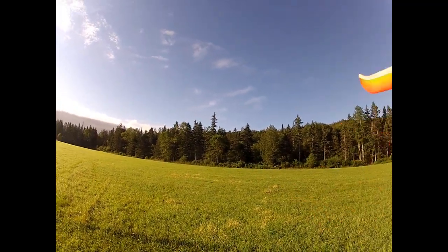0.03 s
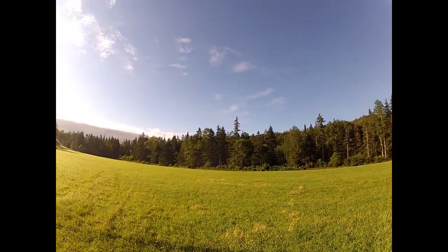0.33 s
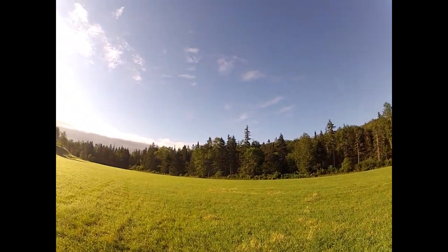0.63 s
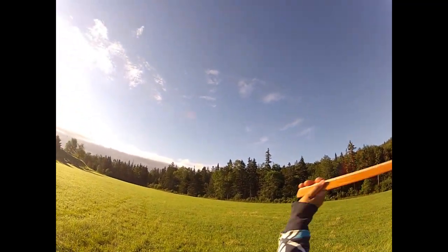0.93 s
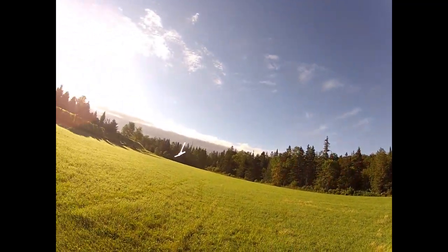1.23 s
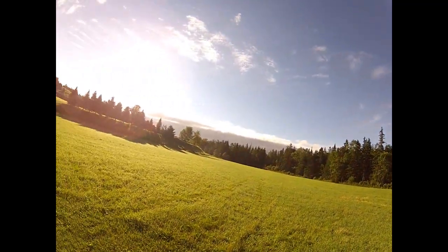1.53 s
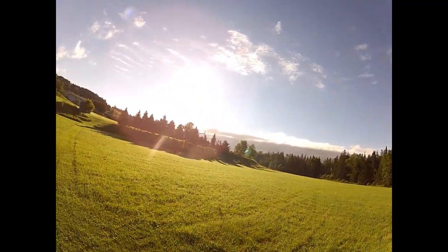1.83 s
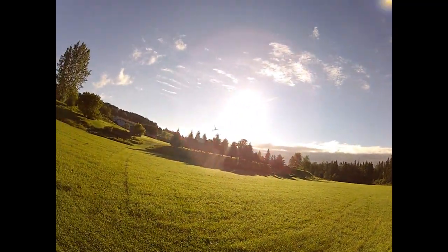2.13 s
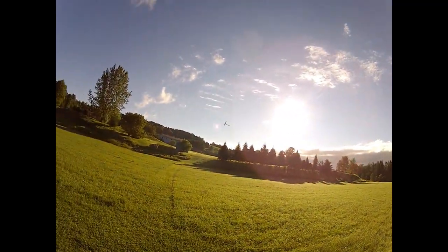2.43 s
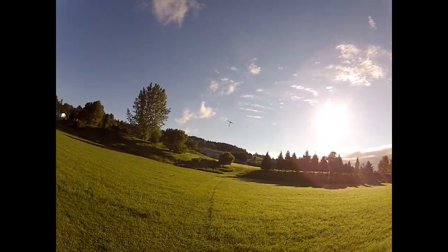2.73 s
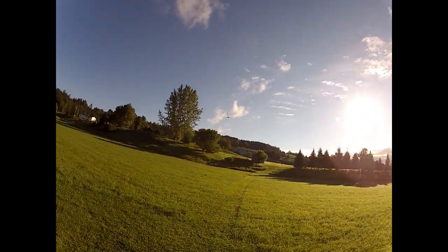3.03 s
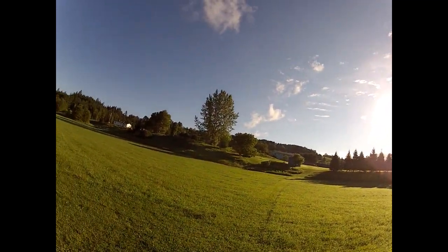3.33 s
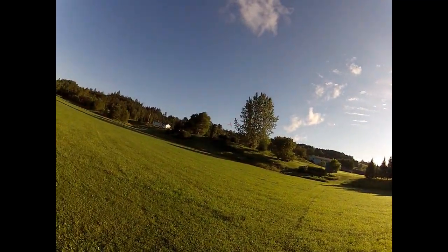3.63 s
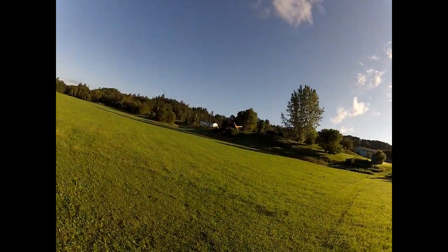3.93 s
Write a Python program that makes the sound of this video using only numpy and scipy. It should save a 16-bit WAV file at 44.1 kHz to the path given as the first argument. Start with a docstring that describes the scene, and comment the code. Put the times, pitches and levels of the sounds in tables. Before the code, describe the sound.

One short whoosh of a boomerang throw amid light clicks, soft wind and distant birdsong.

```python
"""A boomerang is thrown across an open meadow, heard from a small camera worn by the thrower.
From the start low wind rumbles, a faint hum throbs and a songbird sings at the forest edge.
A second in, the plastic mount clicks, arm and blades whoosh past the microphone and a small metal
part, perhaps a zip pull, jingles. Air and clothing rustle as the thrower turns to follow the flight.
A few more clicks and bird notes follow, then rustle and hum sink back into the wind."""
import sys
import numpy as np
from scipy import signal
from scipy.fft import rfft, irfft
from scipy.io import wavfile
from scipy.ndimage import uniform_filter1d

SR = 44100
rng = np.random.default_rng(int(sys.argv[2]) if len(sys.argv) > 2 else 0)


def put_to_file(sound):
    """Save the sound as 16-bit audio at rate SR, in the file named by the first command-line argument."""
    columns = np.atleast_2d(sound).T  # one column per channel
    safe = np.clip(columns, -1, 1)
    whole_steps = np.round(safe * 32767)
    wavfile.write(sys.argv[1], SR, whole_steps.astype(np.int16))


N = 176400
T = np.arange(N) / SR
HZ = np.fft.rfftfreq(N, 1 / SR)


def amp(db):
    """Decibels to gain."""
    return 10 ** (np.asarray(db) / 20)


def unit(x):
    """Scales to rms 1."""
    return x / np.sqrt(np.mean(x ** 2) + 1e-20)


def colour(points):
    """EQ curve through (Hz, dB) points on a log-frequency axis."""
    hz, db = np.transpose(points)
    return amp(np.interp(np.log(HZ + 1), np.log(hz + 1), db))


def level(points):
    """Fader curve through (seconds, dB) points."""
    return amp(np.interp(T, *np.transpose(points)))


def bell(peak_s, width_s):
    """Gaussian swell that peaks at 1."""
    return np.exp(-.5 * ((T - peak_s) / width_s) ** 2)


def hump(hz, width):
    """Gain of a steep-sided resonance."""
    return 1 / (1 + ((HZ - hz) / (.5 * width)) ** 4) ** .5


def band_power(bands):
    """Summed power spectrum of several resonances."""
    return sum((amp(db) * hump(hz, width)) ** 2 for hz, width, db in bands)


def noise(gain):
    """Noise of rms 1 with the given spectrum."""
    return unit(irfft(rfft(rng.standard_normal(N)) * gain, N))


def wander(hz):
    """Random drift of rms 1, up to about the given rate."""
    return noise(1 / (1 + (HZ / hz) ** 4))


def tone(hz):
    """Sine that follows a pitch curve."""
    return np.sin(2 * np.pi * np.cumsum(hz) / SR)


def patchy(points, patch_db):
    """Coloured noise of rms 1 whose spectrum drifts in small patches of time and frequency."""
    spectra = signal.stft(rng.standard_normal(N), SR, nperseg=1024, noverlap=768)[2]
    patches = uniform_filter1d(rng.standard_normal(spectra.shape), size=10, axis=0)
    patches = unit(uniform_filter1d(patches, size=14, axis=1))
    mottled = signal.istft(spectra * amp(patch_db * patches), nperseg=1024, noverlap=768)[1][:N]
    return unit(irfft(rfft(mottled) * colour(points), N))


def add(mix, start_s, sound):
    """Mixes a sound in at a time."""
    part = mix[max(round(start_s * SR), 0):][:len(sound)]
    part += sound[:len(part)]


def whoosh(peak_s=1.084, hold_s=.029, rise_db_per_s=511, fall_db_per_s=696):
    """Eddies shed by arm and blades swell, pass the microphone and leave a soft wake."""
    # Body of the whoosh. Each row: centre in Hz, width in Hz, relative level in dB.
    resonances = [(107, 75, -4), (251, 83, 4.5), (359, 104, 3.5), (680, 306, -4), (1310, 540, -26),
                  (1960, 310, -20)]
    # Hiss beneath the body. Each row: frequency in Hz, relative level in dB.
    hiss_eq = [(40, -8.5), (500, -33), (1100, -16.5), (2400, -29), (2900, -26), (3700, -29.5),
               (4800, -29.5), (5400, -38), (5900, -51)]
    spectrum = np.sqrt(colour(hiss_eq) ** 2 + band_power(resonances))
    swell = amp(-rise_db_per_s * np.maximum(peak_s - T, 0))
    swell *= amp(-fall_db_per_s * np.maximum(T - peak_s - hold_s, 0))
    rush = swell * noise(spectrum) * amp(2 * wander(hz=119))  # eddies roughen the level
    rush *= np.linalg.norm(swell) / np.linalg.norm(rush)
    wake = bell(peak_s + hold_s, width_s=.04) * noise(spectrum)
    wake *= np.maximum(swell, T > peak_s) ** .5  # fades in with the rush
    return amp(-30) * rush + amp(-42.5) * wake


def blade_swish():
    """The blades cut the air brightly at the fastest moment of the throw."""
    # Bright edge of the blades. Each row: centre in Hz, width in Hz, relative level in dB.
    resonances = [(1283, 320, 3.5), (1570, 190, -11), (1920, 270, -11.5)]
    swell = bell(peak_s=1.103, width_s=.015)
    rush = swell * noise(np.sqrt(band_power(resonances)))
    return amp(-36.5) * rush * np.linalg.norm(swell) / np.linalg.norm(rush)


def taps(hits, modes, crack_db, attack_s=.00038, crack_decay_s=.001):
    """Each contact gives a brief crack and rings the modes of a small part."""
    out, t = np.zeros(N), np.arange(2048) / SR
    crack = noise(hump(hz=2400, width=2400))
    for start_s, db in hits:
        ring = sum(amp(mode_db - 60 * t / t60) * np.sin(2 * np.pi * (hz * t + rng.random()))
                   for hz, mode_db, t60 in modes)
        snap = amp(crack_db) * np.exp(-t / crack_decay_s) * crack[round(start_s * SR):][:len(t)]
        add(out, start_s, amp(db) * np.minimum(t / attack_s, 1) * (ring + snap))
    return out


def mount_clicks():
    """The plastic camera mount clicks with a hard snap and a short ring."""
    # Clicks of the mount. Each row: start in seconds, gain in dB.
    hits = [(.9870, -33), (1.1500, -40.5), (1.8122, -38.5), (1.9175, -42.5), (2.894, -53)]
    # Ring of the plastic. Each row: pitch in Hz, relative level in dB, seconds to fall 60 dB.
    modes = [(900, -9.5, 0.028), (2220, -15, 0.013), (2600, -17, .02), (2880, -9.5, 0.015),
             (3880, -17.5, 0.016), (4660, -7.5, .015), (4780, -14, .01)]
    return taps(hits, modes, crack_db=-8)


def zip_pull():
    """A small metal tab jingles in thin, high ticks around the throw."""
    # Ticks of the tab. Each row: start in seconds, gain in dB.
    hits = [(.9842, -59), (1.0127, -49), (1.0560, -42), (1.1732, -44.5), (1.1772, -41), (1.1970, -50),
            (1.2110, -47), (1.2210, -47)]
    # Ring of the metal. Each row: pitch in Hz, relative level in dB, seconds to fall 60 dB.
    modes = [(3080, -2.5, 0.011), (4140, -7, 0.011), (5050, -7, 0.018), (5220, -9, 0.019),
             (5570, -27.5, 0.0098)]
    return taps(hits, modes, crack_db=-17)


def rustle():
    """Air and clothing rub as the thrower turns, with a few short brushes of cloth."""
    # Swell of the turn. Each row: time in seconds, level in dB.
    turn_fader = [(0, -56), (.8, -55.5), (1.2, -50), (1.55, -50), (1.85, -50.5), (2.2, -53.5), (2.5, -60.5),
                  (3.05, -69.5), (3.5, -61), (4, -61)]
    # Tone of the rustle. Each row: frequency in Hz, relative level in dB.
    turn_eq = [(100, 7), (300, -1), (750, 7.5), (1050, 0), (1350, -3), (2000, -8), (2700, -18.5),
               (4700, -27.5), (5900, -58)]
    # Cloth brushes. Each row: peak and half length in seconds, centre and width in Hz, level in dB.
    brushes = [(0.187, 0.023, 4860, 1000, -72), (1.193, 0.0071, 720, 300, -47),
               (2.205, 0.053, 2330, 450, -63)]
    out = level(turn_fader) * patchy(turn_eq, patch_db=-.5) * amp(.92 * wander(hz=30))
    for peak_s, half_s, hz, width, db in brushes:
        out += amp(db) * bell(peak_s, half_s) * noise(hump(hz, width))
    return out


def wind():
    """Steady air moves over the meadow and buffets the camera housing with a low rumble."""
    # Bed of outdoor air. Each row: frequency in Hz, relative level in dB.
    air_eq = [(20, -13), (48, -12.5), (76, -4), (110, -1.5), (150, -5), (200, -15.5), (290, -13),
              (350, -22), (460, -16), (570, -18.5), (780, -16), (1020, -30), (1400, -30), (2300, -34.5),
              (2900, -33), (3600, -38), (4150, -37), (5100, -44), (5900, -57)]
    # Gusts on the housing. Each row: time in seconds, level in dB.
    buffet_fader = [(0, -57.5), (.8, -55), (1.5, -50), (2.3, -51.5), (2.95, -52.5), (3.3, -56.5),
                    (4, -55.5)]
    # Tone of the gusts. Each row: frequency in Hz, relative level in dB.
    buffet_eq = [(30, -36), (70, -4.5), (110, 4), (150, -2), (200, -11), (500, -50)]
    air = amp(-48.5) * patchy(air_eq, patch_db=.8)
    return air + level(buffet_fader) * noise(colour(buffet_eq))


def hum(hum_hz=119.5, drone_hz=49.4, sags_per_s=5.4, sag_depth=.33, waver_hz=24):
    """A low hum sags in pitch several times a second, over a deeper wavering drone."""
    # Rise and fall of the hum. Each row: time in seconds, level in dB.
    hum_fader = [(0, -59), (.8, -49.5), (1.5, -48.5), (2.0, -50.5), (2.3, -46), (2.85, -48.5), (3.2, -55),
                 (4, -62.5)]
    sag = (T - 2.115) * sags_per_s % 1  # sawtooth: the pitch slides down and jumps back
    pitch = hum_hz * (1 + sag_depth * (.5 - sag))
    throb = tone(pitch * (1 + .0405 * wander(waver_hz)))
    throb *= amp(.6 * wander(waver_hz))
    drone = tone(drone_hz * (1 + .1393 * wander(waver_hz)))
    return level(hum_fader) * unit(throb) + amp(-55) * unit(drone)


def songbird(fade_s=.012, flutter_hz=120, forest_t60_s=.61):
    """Gliding whistles from far off, with a thin echo from the trees."""
    # The song. Each row: start and length in seconds, first, middle and last pitch in Hz, level in dB.
    notes = [(0.014, 0.098, 3950, 3310, 3300, -66), (.335, .07, 4450, 4600, 4500, -74),
             (.43, .055, 3200, 3450, 3700, -72), (.53, .07, 3150, 3310, 2700, -70),
             (.605, .055, 3350, 3650, 3680, -73), (1.218, .048, 2950, 3520, 2850, -61),
             (1.272, .055, 2800, 3450, 2850, -60), (1.482, .045, 3550, 3550, 3520, -69),
             (1.62, .052, 3150, 3350, 3330, -64), (1.718, .036, 3950, 3000, 2900, -64),
             (1.75, 0.038, 2960, 3300, 4000, -62), (1.791, 0.15, 3670, 3600, 3590, -69),
             (2.26, 0.032, 3160, 3220, 3100, -64), (2.308, 0.039, 3690, 3600, 3300, -64),
             (2.344, 0.044, 3150, 2820, 2610, -62), (2.42, 0.055, 2980, 3070, 3140, -62.5),
             (2.468, 0.031, 3150, 3650, 4050, -63)]
    song = np.zeros(N)
    waver = 1 + .006 * wander(flutter_hz)
    for start_s, length_s, first, middle, last, db in notes:
        t = np.arange(0, length_s, 1 / SR)
        pitch = np.interp(t / length_s, [0, .5, 1], [first, middle, last])
        pitch *= waver[round(start_s * SR):][:len(t)]
        envelope = np.clip(np.minimum(t, length_s - t) / fade_s, 0, 1)
        add(song, start_s, amp(db) * envelope * tone(pitch))
    song *= amp(-2 * wander(flutter_hz))
    tail = rng.standard_normal(SR) * amp(-60 * T[:SR] / forest_t60_s)
    echo = signal.fftconvolve(song, tail / np.linalg.norm(tail))[:N]
    return song + amp(-5) * echo


def distant_birds(count=4, centre_hz=4017):
    """Farther birds twitter at random in overlapping scraps of whistle."""
    out = np.zeros(N)
    for _ in range(count):
        pitch = centre_hz * (1 + .03 * wander(hz=29.88))
        gate = np.clip(wander(hz=7.2), 0, 1)
        out += gate * tone(pitch)
    return amp(-81) * unit(out)


def scene():
    """Every source sits in the centre; only a trace of hiss differs between the sides."""
    # Tone of the stereo hiss. Each row: frequency in Hz, relative level in dB.
    side_eq = [(30, -8), (250, 17.5), (700, -1.5), (1300, -12.5), (2200, 3), (4200, 13.5), (5900, 7)]
    throw = whoosh() + blade_swish() + mount_clicks() + zip_pull()
    mid = throw + rustle() + wind() + hum() + songbird() + distant_birds()
    side = amp(-83.5) * noise(colour(side_eq))
    return np.array([mid + side, mid - side])


def record(dry, sample_hz=12000, cutoff_hz=15350):
    """The camera's slow sampling keeps the lower band and mirrors it upward; a low-pass trims the top."""
    # Strength of the mirrored treble. Each row: frequency in Hz, gain in dB.
    mirror_eq = [(6000, 0), (7000, -3), (8000, -6), (9000, -10), (10000, -14), (11200, -23), (11650, -31),
                 (12000, -45), (12350, -31), (12800, -25), (14000, -18), (15200, -15)]
    low = irfft(rfft(dry) * (HZ < sample_hz / 2), N)
    mirrored = low * (1 + 2 * np.cos(2 * np.pi * sample_hz * T))
    shaped = irfft(rfft(mirrored) * colour(mirror_eq), N)
    lowpass = signal.firwin(511, cutoff_hz, window=("kaiser", 9), fs=SR)
    return signal.oaconvolve(shaped, lowpass[None], "same")


dry = scene()
out = record(dry)
put_to_file(out)
```